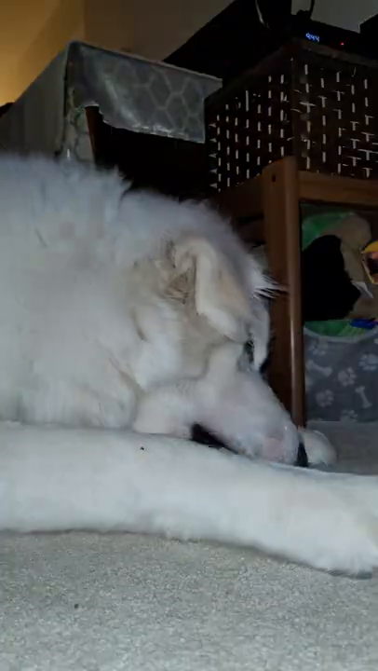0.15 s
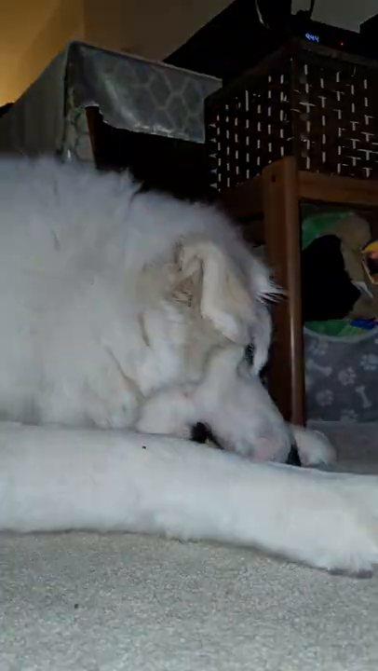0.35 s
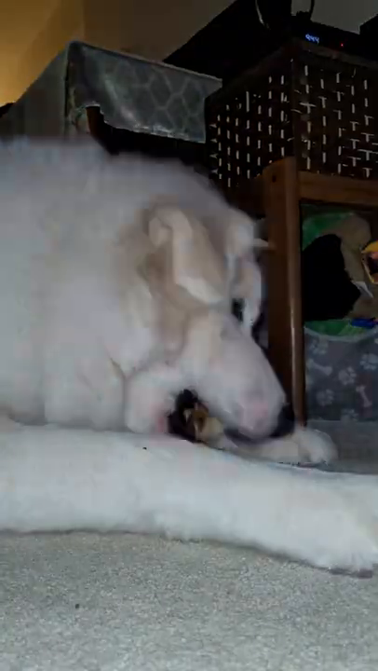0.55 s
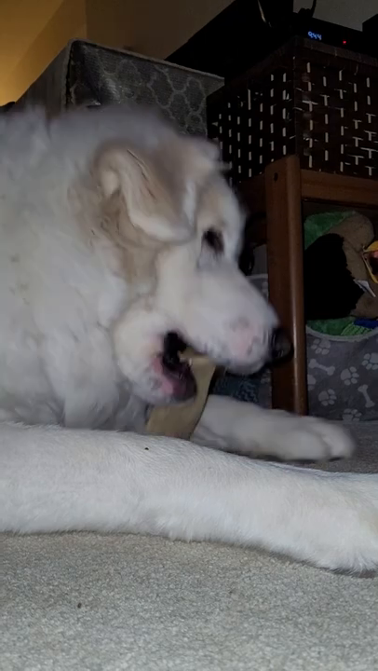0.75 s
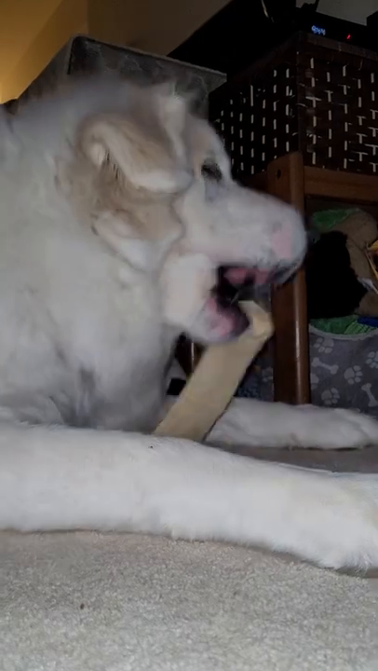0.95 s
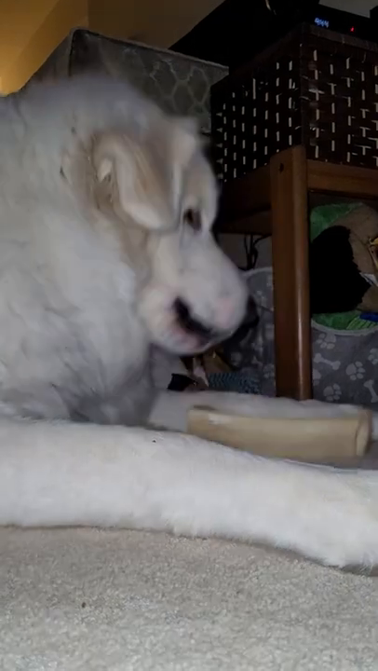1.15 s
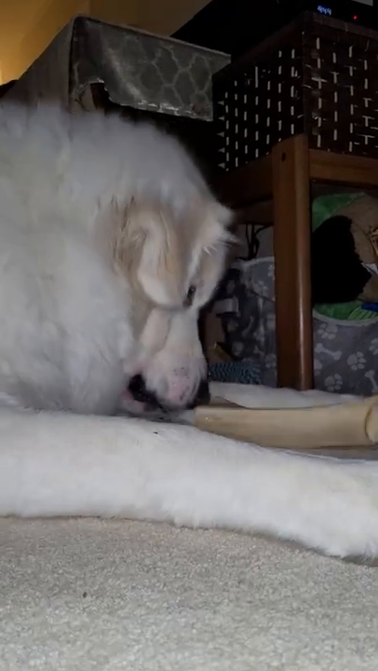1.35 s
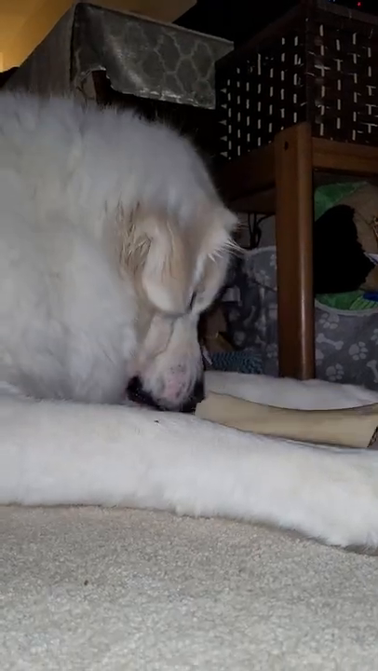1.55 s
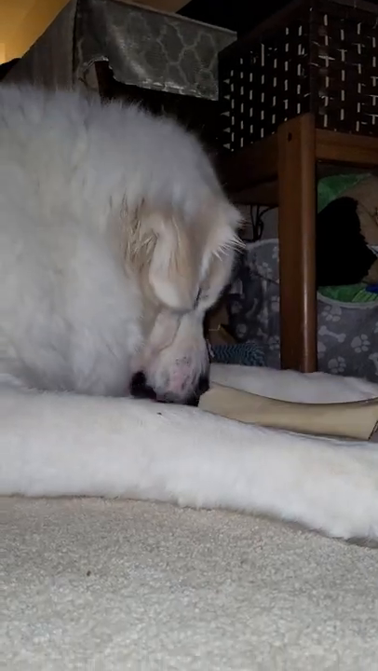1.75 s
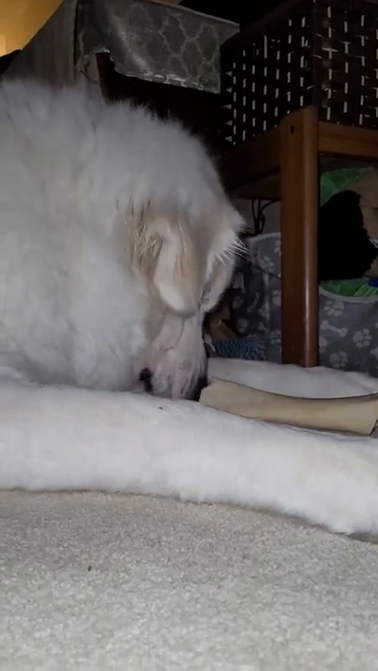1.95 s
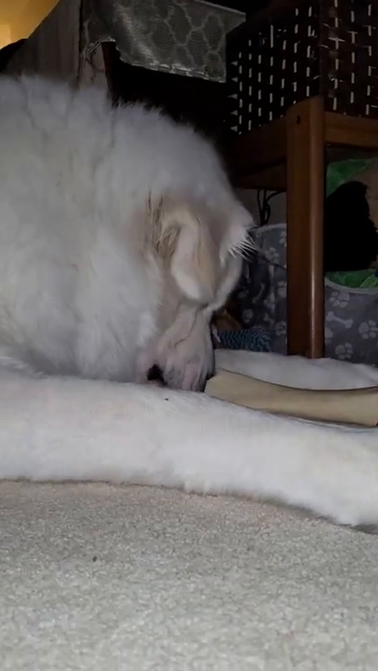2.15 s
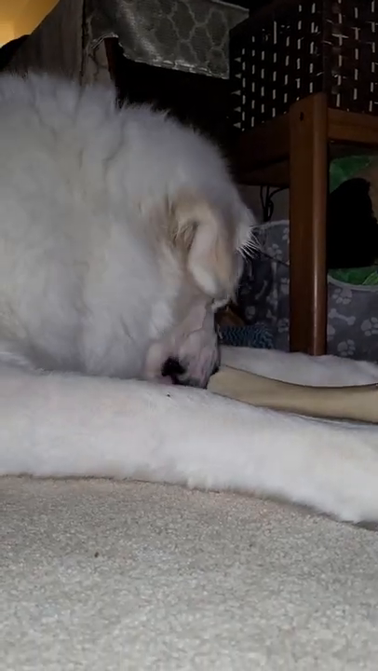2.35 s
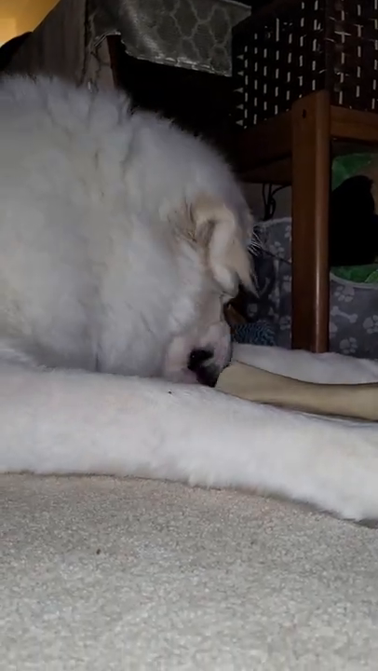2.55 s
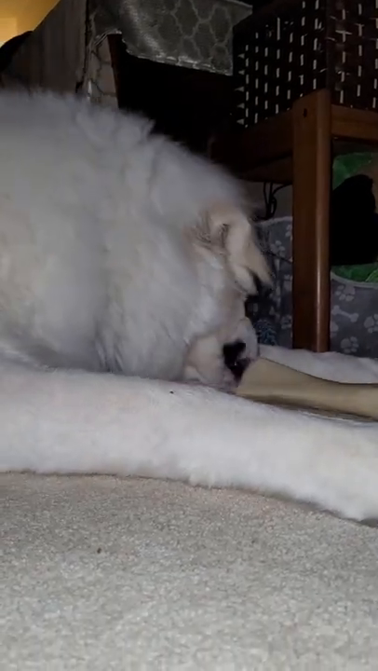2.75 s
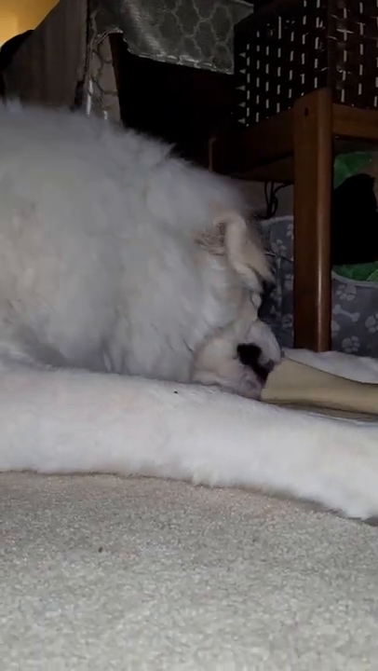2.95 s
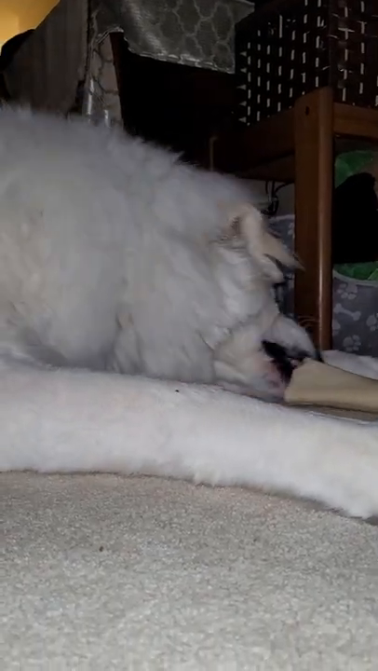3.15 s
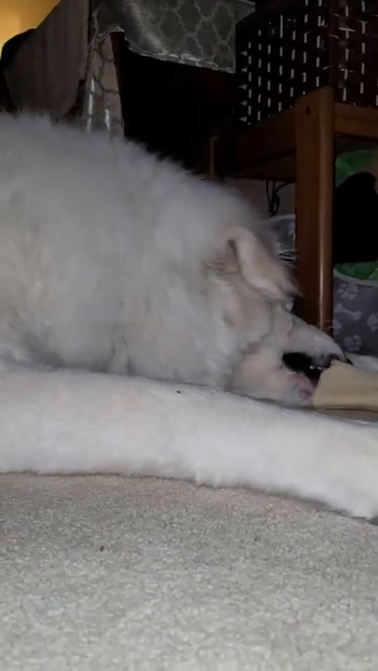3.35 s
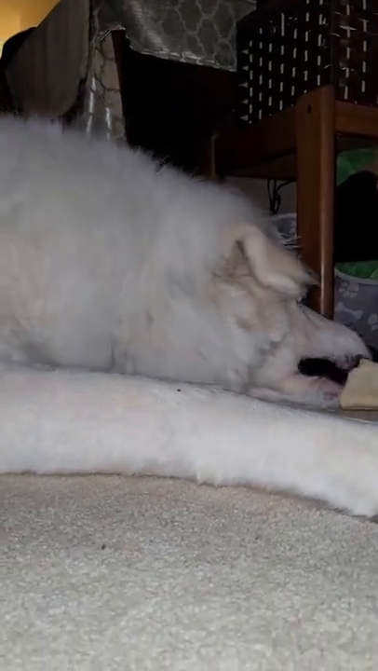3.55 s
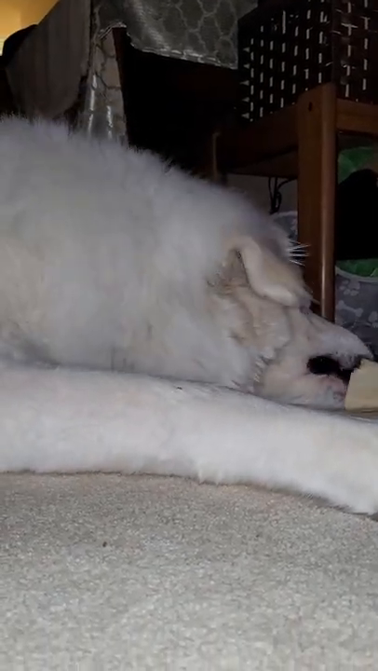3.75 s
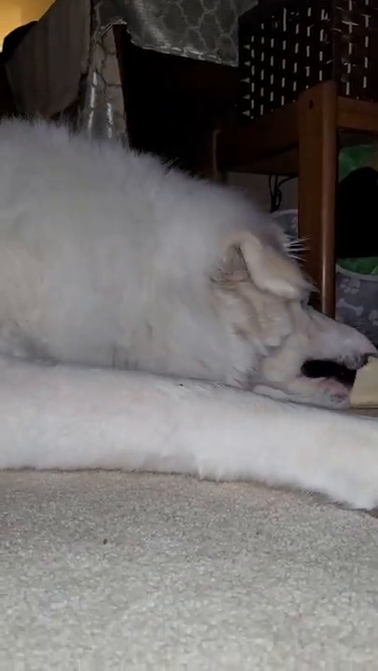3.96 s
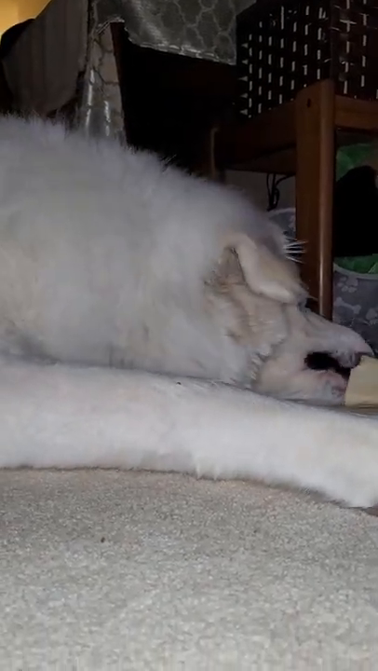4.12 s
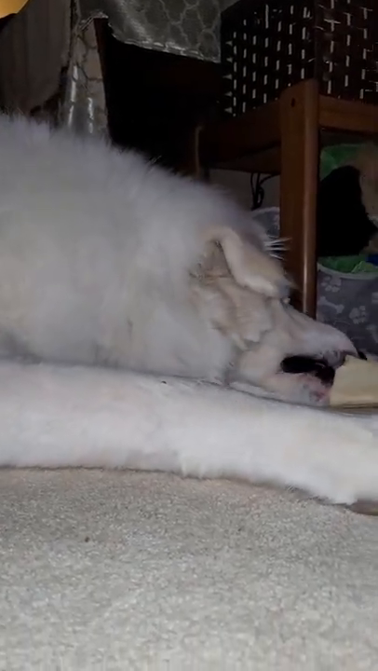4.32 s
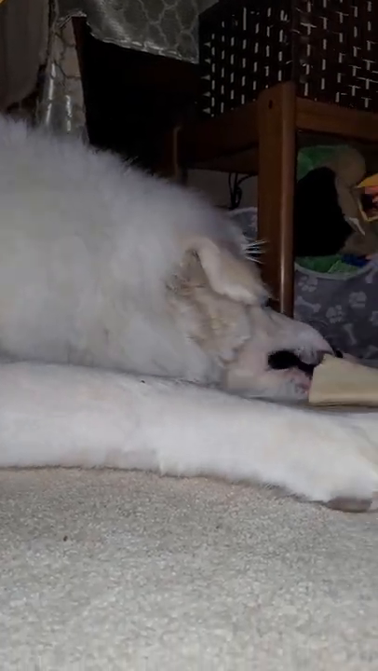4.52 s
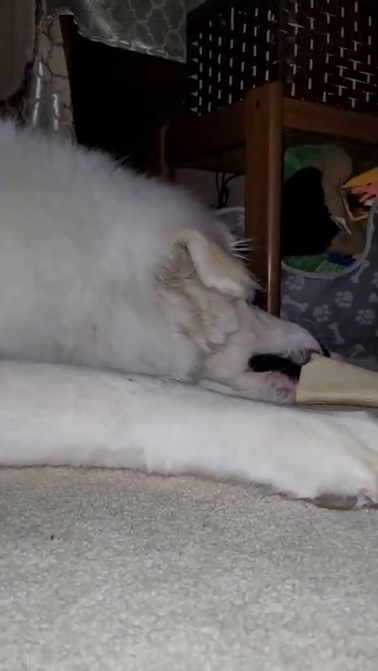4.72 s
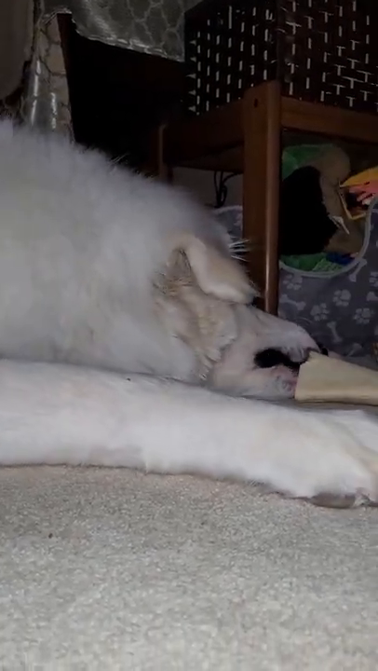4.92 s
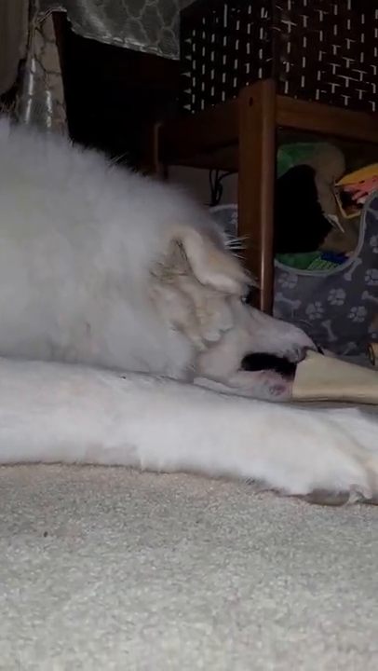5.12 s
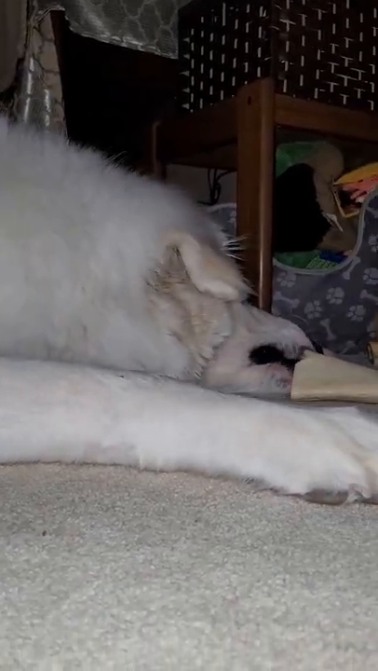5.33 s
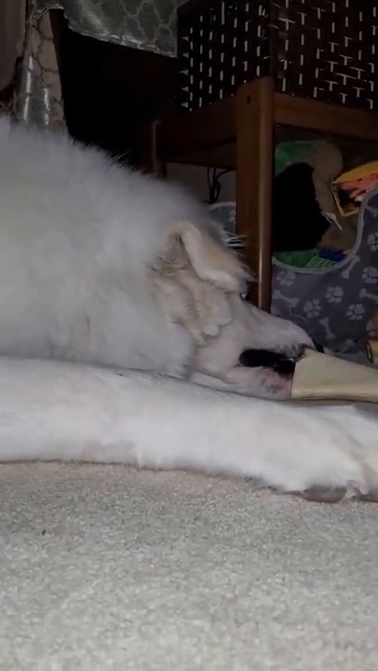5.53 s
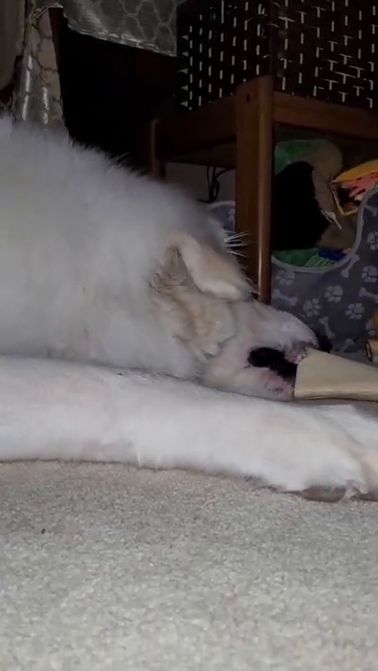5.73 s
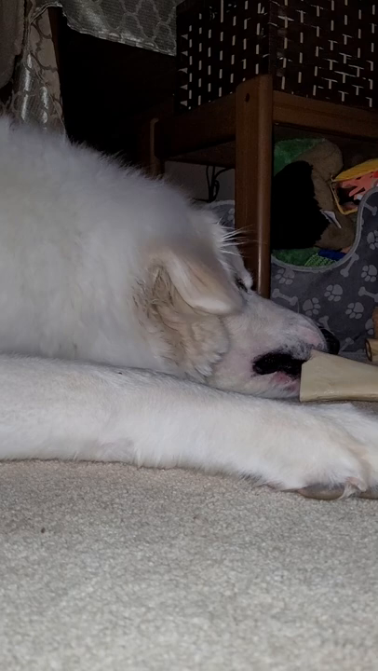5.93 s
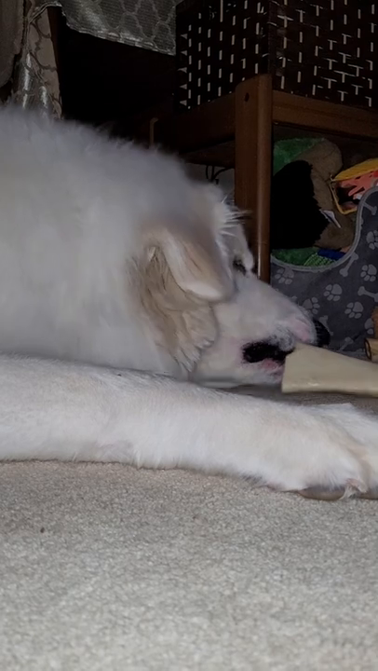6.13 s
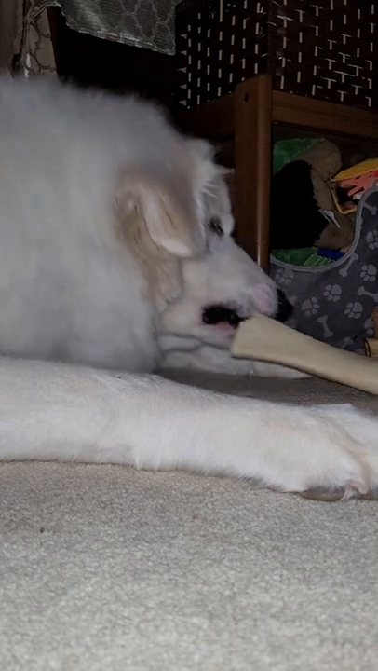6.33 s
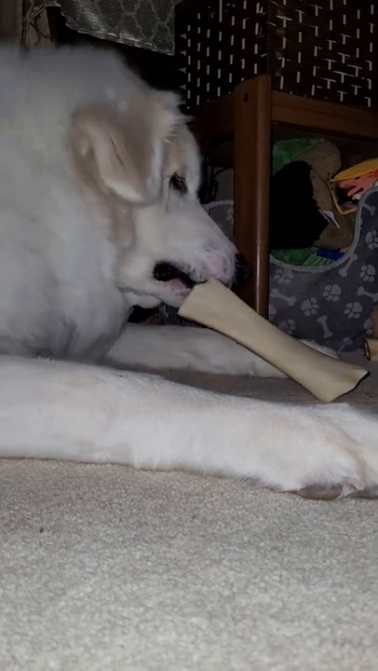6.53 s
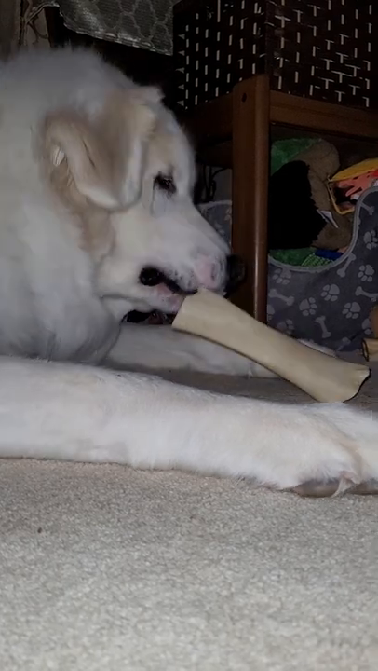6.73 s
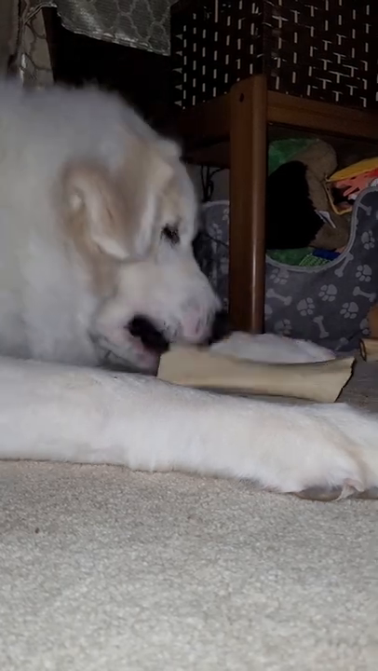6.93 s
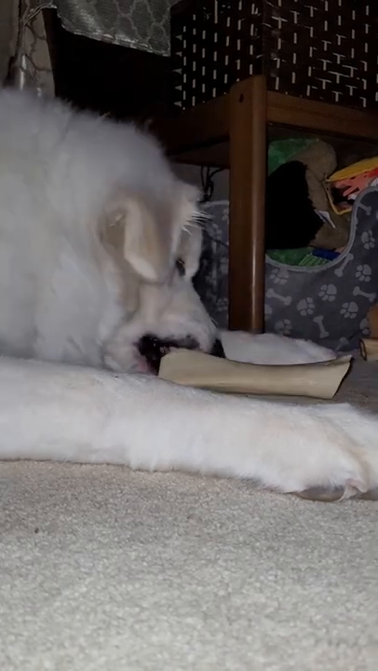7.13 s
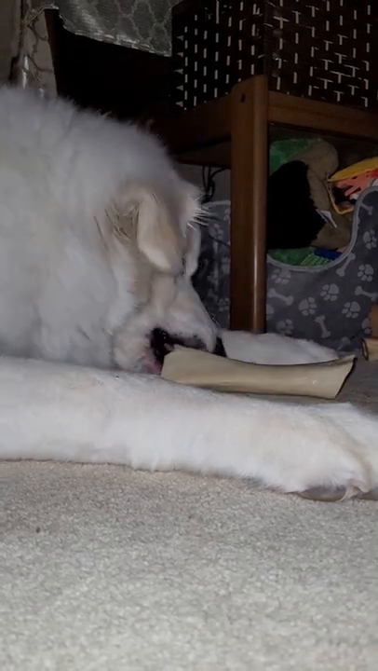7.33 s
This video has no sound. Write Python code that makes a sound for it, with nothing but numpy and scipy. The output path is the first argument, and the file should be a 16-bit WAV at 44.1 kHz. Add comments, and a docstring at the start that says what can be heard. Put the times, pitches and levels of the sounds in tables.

```python
"""A large dog chews a hollow bone on a carpet, heard from a phone on the floor. At first teeth knock and
grind, the bone drops with thuds, and a hand and carpet fibres rustle, tick and pop at the phone's right
microphone. After 2 s come soft grinding and sniffs. From 3 s the dog puffs through its nose and bites
harder, and the rustle builds again. From about 4.7 s the chewing and puffing go on almost alone,
until rustle and a few soft thuds return near 7 s."""
import sys
import numpy as np
from scipy import signal
from scipy.fft import rfft, irfft
from scipy.io import wavfile

SR = 44100
rng = np.random.default_rng(int(sys.argv[2]) if len(sys.argv) > 2 else 0)


def put_to_file(sound):
    """Save the sound as 16-bit audio at rate SR, in the file named by the first command-line argument."""
    columns = np.atleast_2d(sound).T  # one column per channel
    safe = np.clip(columns, -1, 1)
    whole_steps = np.round(safe * 32767)
    wavfile.write(sys.argv[1], SR, whole_steps.astype(np.int16))


N = 329868

# tone of the quiet room: f/Hz, level/dB
ROOM_TONE = [(40, -3.5), (100, -2.5), (180, -7), (350, -14.5), (500, -27.5), (700, -41.5), (1000, -35),
             (2500, -37.5), (7000, -43.5), (13000, -39.5)]
# how alike the room tone is left and right: f/Hz, likeness (0 to 1)
ROOM_LIKENESS = [(60, 1), (400, 0), (1000, 0), (4000, 0)]

# notes the floorboards ring at: f/Hz, width/Hz, level/dB
BOARD_MODES = [(57, 16, 4.5), (79, 21, -6), (107.8, 25, -1), (152.6, 20, -5.5)]
# floor rumble under the dog: t/s, relative level/dB
RUMBLE = [(0, -69), (.2, -61), (.6, -70), (.73, -55.5), (.9, -75), (1.16, -52.5), (1.2, -62),
          (1.242, -31.5), (1.32, -45), (1.39, -46), (1.58, -59), (1.65, -54), (1.92, -54.5), (2.42, -67.5),
          (2.55, -61), (2.94, -62), (3.07, -73.5), (3.73, -66), (3.77, -80), (3.806, -62), (4.26, -64.5),
          (4.59, -54), (4.69, -61.5), (5.06, -69), (5.5, -61), (5.8, -70.5), (5.88, -59.5), (6.5, -67.5),
          (6.87, -56), (6.99, -64.5), (7.06, -55.5), (7.31, -59), (7.478, -65)]
# bone or phone landing: t/s, right peak/dB, base f/Hz, left minus right/dB, ring time/s
THUDS = [(0.1254, -47, 78, -6, 0.11), (0.598, -47, 76, -18.5, 0.051), (0.743, -43, 67, -22, 0.12),
         (0.828, -43, 63.4, -24, 0.068), (1.008, -34.5, 63, -21, 0.12), (1.069, -35, 67, -19, 0.066),
         (1.2514, -16.5, 66.6, -11.5, 0.058), (1.2898, -34, 67.5, 7, 0.08), (1.3327, -37, 60, -5, 0.23),
         (1.382, -26.5, 76, -5.5, 0.12), (1.4607, -36.5, 90, -34, 0.1), (1.928, -25.5, 68.4, -34, 0.03),
         (2.228, -45.5, 66, -24, 0.077), (4.518, -40, 75, -16.0, 0.092), (4.578, -31, 110, -22, 0.044),
         (4.6008, -26.5, 48, -33, 0.073), (4.7322, -49.5, 74.6, -8, 0.29), (7.0626, -38.5, 65.5, -7, 0.19),
         (7.316, -49, 53, -7.9, 0.086), (7.4095, -44.5, 59.7, -10, 0.093)]

# rubbing on the phone, in relative levels: t/s, rustle/dB, scratch over fine rustle/dB, low chafing/dB
RUBBING = [(0, -71.5, -1, -56.5), (.2, -69, 1.5, -52), (.274, -80.5, 1, -63), (.35, -74, -13, -61),
           (.529, -72.5, -14.5, -58.5), (.579, -54, -1, -42.5), (.649, -77.5, 7.5, -50),
           (.833, -62, -2.5, -48), (.913, -67, 6, -52), (.948, -54, 4.5, -42), (1.2, -60, -3, -49),
           (1.232, -56.5, 0.5, -33.5), (1.29, -62, 6, -52), (1.482, -61.5, -2, -58), (1.61, -75.5, -3, -70),
           (1.711, -66.5, -7.5, -53), (1.856, -63, -14, -59), (1.926, -58, 1.5, -44),
           (2.15, -76, -10.5, -77.5), (2.65, -88.5, -12.5, -77.5), (2.95, -94, 3, -68.5),
           (3.113, -74.5, 2.5, -72.5), (3.29, -86.5, 2.5, -69), (3.48, -71.5, -10.5, -70),
           (3.687, -67, -9, -69), (3.771, -74, -15, -74), (3.841, -64.5, -18, -51), (3.926, -59, -3.5, -65),
           (4.076, -63, -3.5, -61), (4.18, -58, 1, -55), (4.235, -51.5, -2.5, -47), (4.41, -53, 1, -51.5),
           (4.57, -52, 3, -39), (4.83, -90, -0.5, -77), (5.3, -83, -0.5, -78), (5.45, -93, -9, -74),
           (5.75, -84, -5, -72.5), (5.9, -90.5, -5, -64.5), (6.2, -93.5, -1, -74.5),
           (6.66, -91.5, -5.5, -69), (6.74, -74.5, -18, -74), (6.84, -84, -15.5, -63),
           (6.91, -71, -11, -68.5), (7.07, -69, -19, -69), (7.149, -65.5, -7, -61),
           (7.288, -59.5, -3.5, -51), (7.478, -63, -2.5, -56.5)]
# tone of the fine rustle: f/Hz, level/dB
RUSTLE_TONE = [(1500, -24), (3500, -9), (5000, -2.5), (7500, 0), (8500, -11.5), (16000, -13.5)]
# tone of the coarse scratch: f/Hz, level/dB
SCRATCH_TONE = [(300, -5.5), (1000, -0.5), (2500, -2.5), (4000, -6.5), (8000, -23.5)]
# tone of the dry crackle: f/Hz, level/dB
CRACKLE_TONE = [(3000, -22.5), (7000, -7.5), (10000, 0), (16000, 8.5)]
# loud snaps of carpet fibres: t/s, right peak/dB, f/Hz, width/octaves
FIBRE_SNAPS = [(.126, -40, 3850, 1.9), (0.1686, -45.5, 7000, 0.79), (0.2052, -21, 6300, 1.46),
               (.5498, -42.5, 1620, 1.3), (0.5943, -11.5, 2690, 1.42), (0.5972, -21.5, 3390, 2.3),
               (.6046, -19, 9000, 6.5), (0.645, -44, 900, 1.3), (.668, -41, 900, 1.3),
               (.694, -35, 1380, 1.94), (.7401, -40, 840, 0.48), (0.783, -38, 5620, 2.5),
               (0.8154, -28, 1390, 2.6), (0.8487, -31, 4460, 2.5), (0.9319, -28.5, 1590, 1.9),
               (0.9526, -22, 1750, 2.6), (0.961, -28, 3070, 1.9), (0.995, -25.5, 2070, 2.3),
               (1.0203, -25, 3900, 1.85), (1.0537, -22, 10100, 1.9), (1.0567, -19.5, 2700, 0.89),
               (1.078, -13, 6940, 10), (1.215, -30.5, 11100, 0.87), (1.226, -29, 2810, 6.7),
               (1.238, -24.5, 2240, 2.7), (1.2453, -23.5, 10700, 1.2), (1.248, -28, 4800, 5.8),
               (1.3417, -36.5, 2370, 0.5), (1.3909, -32, 6960, 1.36), (1.433, -31, 8360, 2.3),
               (1.6037, -43, 5450, 0.8), (1.714, -40, 6800, 1.3), (1.7904, -36.5, 5350, .7),
               (1.8604, -42, 6080, 1), (1.8932, -39, 4580, 1.9), (1.9165, -21, 2080, 0.67),
               (1.955, -36, 5400, 0.67), (2.7059, -55, 5850, 0.85), (3.083, -50.5, 5000, 0.78),
               (3.1171, -46, 2690, 2.4), (3.3215, -49, 2850, 3.3), (3.461, -50, 6000, 1.7),
               (3.5282, -43, 4560, 0.44), (3.564, -46.5, 6200, .82), (3.6208, -45, 4700, 2),
               (3.665, -42.5, 2300, 2.2), (3.814, -37, 9000, 4.1), (3.8372, -27.5, 11300, 0.73),
               (3.8534, -37.5, 7800, 0.39), (3.908, -24, 5430, 1.8), (3.934, -30.5, 4100, 1.5),
               (4.004, -33.5, 4000, 5.2), (4.044, -38, 8070, 1.6), (4.072, -30.5, 9900, 0.56),
               (4.1446, -30, 8090, 1.6), (4.214, -17, 1800, 2.17), (4.2217, -12, 6460, 12),
               (4.235, -29, 7150, 2), (4.2532, -11, 7000, 4.2), (4.2556, -25, 4780, 1.6),
               (4.265, -25, 3380, 3.1), (4.2733, -34, 3370, 2.3), (4.2907, -33, 3570, 2.9),
               (4.308, -15.5, 7400, 7.4), (4.3321, -33, 1700, .59), (4.3372, -27, 3540, 2.5),
               (4.3595, -23.5, 2670, 1.6), (4.3672, -24, 1860, 2.15), (4.3798, -27, 7200, 2),
               (4.442, -18.5, 4420, 2), (4.4461, -15, 4470, 1.73), (4.505, -22, 6510, 3),
               (4.524, -14.5, 3140, 1.26), (4.551, -26, 5620, 1.8), (4.5918, -24, 3580, 4.5),
               (4.6494, -29.5, 6350, 3.6), (4.7052, -39, 2880, 0.9), (5.1307, -47.5, 8430, .74),
               (5.638, -45.5, 10900, 1.3), (6.069, -39, 2900, 2.2), (6.9063, -33.5, 5800, 2.7),
               (6.9225, -35, 9100, 3.8), (7.0204, -40.5, 5590, 3.1), (7.1453, -22.5, 5770, 4.5),
               (7.1783, -29.5, 7300, 1.4), (7.2751, -30.5, 3790, 1.9), (7.2998, -30, 2040, 5.1),
               (7.3506, -19, 4930, 2.1), (7.394, -30, 3520, 4.7), (7.4067, -28.5, 10400, 1.2),
               (7.4479, -27.5, 9690, 2.2)]
# skin slipping on the phone case: t/s, right peak/dB, base f/Hz, left minus right/dB
SKIN_POPS = [(0.2051, -37.5, 615, -13), (0.5616, -45, 234, -21), (0.5943, -32.5, 357, -44),
             (0.6185, -47.5, 700, -19.5), (0.6685, -53, 209, -9), (0.695, -35, 710, -25),
             (.738, -37, 300, -21), (0.74, -35.5, 750, -26), (0.8163, -31.5, 660, -24),
             (0.9583, -28.5, 473, -29), (1.056, -45, 285, -8), (1.0782, -43, 257, -14),
             (1.135, -56, 355, -25.3), (1.2447, -31, 248, -17), (1.351, -43.5, 250, -15),
             (1.4116, -38, 221, -26), (1.4555, -35, 224, -17), (1.488, -42.5, 313, -33.6),
             (1.6411, -37.5, 210, -17), (1.7012, -40.5, 224, -16), (1.7328, -39.5, 223, -19.7),
             (1.7741, -39.5, 236, -21.4), (1.8163, -41, 280, -17.5), (1.8868, -43, 250, -22),
             (1.9214, -31, 248, -10.5), (1.9338, -40.5, 453, -27), (1.9881, -45, 253, -19.6),
             (2.0127, -39.5, 226, -18), (2.2003, -40, 223, -23), (4.2159, -31, 1113, -49),
             (4.2529, -40, 760, -32), (4.3608, -41, 317, -31), (4.4439, -38, 610, -34),
             (4.5244, -38, 393, -33.0), (4.717, -51, 233, -23), (7.1464, -49.5, 269, -13),
             (7.276, -42.5, 330, -26), (7.299, -43, 340, -25), (7.306, -42.5, 780, -29),
             (7.353, -49, 393, -23), (7.396, -46.5, 554, -19)]

# puffs through nose and lips: t/s, hold/s, left level/dB, high hiss over nose sound/dB
PUFFS = [(0.066, 0.073, -73.5, -10), (.654, 0.064, -84, -2), (.82, 0.19, -74, -7), (1.156, .04, -79, -6),
         (1.252, .03, -75, -14), (1.94, .01, -72, -3), (3.113, 0.17, -78, -5), (3.301, 0.016, -67, 5),
         (3.448, 0.12, -76.5, -2), (3.647, .03, -75, -6), (3.696, .04, -69, 5), (3.786, .002, -67, 4),
         (3.947, .03, -79, -4), (4.05, 0.11, -69.5, 3), (4.347, .02, -67, 4), (4.463, 0.07, -64, 4),
         (4.762, .01, -73, 5.5), (4.867, 0.072, -70, 1), (5.165, 0.021, -73.5, 4), (5.277, 0.083, -68, 1.5),
         (5.54, 0.077, -75.5, 2.5), (5.696, 0.097, -67, 4), (6.879, 0.092, -83, -1), (7.29, .02, -76, 8)]
# bands the nose rings in: f/Hz, width/Hz, level/dB
NOSE_MODES = [(5770, 2700, -9.5), (7400, 550, -0.5), (2150, 1500, -15.5)]
# nostril whistle that grows as the air speeds up: f/Hz, width/Hz, level/dB
NOSTRIL_MODE = [(4580, 790, 0)]
# tone of the high hiss in a puff: f/Hz, level/dB
HISS_TONE = [(6000, -31), (8500, -3.5), (12000, 1.5), (16000, -2.5)]
# sniffs, squeaks and wheezes: t/s, length/s, left level/dB, f/Hz, width/Hz
SNIFFS = [(0.842, 0.033, -54, 635, 60), (0.886, 0.023, -57, 2530, 300), (.89, .02, -40.5, 593, 121),
          (0.931, 0.04, -59, 2630, 600), (1.796, 0.045, -75, 955, 700), (2.16, 0.059, -77.5, 850, 600),
          (2.339, .05, -84.5, 800, 703), (2.517, 0.043, -81, 746, 692), (2.717, 0.052, -81.5, 753, 500),
          (2.912, 0.073, -66.5, 770, 253), (3.612, 0.094, -73, 920, 350), (3.68, 0.059, -78, 2620, 1200),
          (3.96, .05, -77, 1600, 300), (4.018, 0.069, -74, 984, 200), (4.374, 0.065, -68.5, 1700, 500),
          (4.442, .1, -76, 810, 300), (4.445, .1, -76.5, 1500, 500), (5.154, 0.068, -78.5, 782, 398),
          (5.564, 0.092, -78, 716, 397), (5.71, 0.065, -85.5, 1740, 502), (6.857, 0.051, -68.5, 4500, 300),
          (7.14, 0.036, -80, 1600, 120), (7.273, 0.059, -68, 780, 250)]

# notes the hollow bone rings at: f/Hz, width/Hz, level/dB
BONE_MODES = [(240, 110, 3.5), (396.7, 110, 2), (487.5, 71, 0), (573, 130, -2), (750, 110, -5),
              (827, 270, -11), (2370, 170, -25)]
# teeth grinding along the bone: t/s, hold/s, relative level/dB
GRINDS = [(.06, .08, -56.5), (.2, 0.18, -65.5), (.5, 0.043, -82), (.72, 0.035, -75), (.89, 0.078, -57),
          (1.217, 0.025, -65.5), (1.39, .02, -78), (1.916, .01, -71.5), (2.35, 0.025, -80.5),
          (2.544, 0.019, -77.5), (2.739, 0.0092, -71.5), (2.93, 0.021, -68.5), (3.02, 0.04, -72.5),
          (3.11, 0.068, -62.5), (3.2, 0.044, -57.5), (3.6, 0.016, -71.5), (3.8, 0.06, -62),
          (3.93, 0.057, -70), (4.14, 0.033, -69.5), (4.4, 0.09, -70), (4.57, 0.036, -76),
          (4.74, 0.042, -72), (4.9, 0.068, -73), (5.18, 0.057, -73), (5.34, 0.026, -71), (5.58, 0.029, -75),
          (5.73, 0.05, -83.5), (5.88, 0.032, -73), (6.2, .04, -80), (6.37, 0.046, -70), (6.57, .06, -82),
          (6.79, .03, -73.5), (6.86, 0.024, -72.5), (7.12, 0.087, -81), (7.3, .05, -73), (7.45, .03, -67)]
# teeth striking the bone: t/s, right peak/dB, f/Hz, left minus right/dB, ring time/s
KNOCKS = [(0.0535, -46.5, 443, -3, 0.092), (.093, -40.5, 730, -17, 0.07), (.143, -38, 750, -14, .08),
          (0.1833, -34.2, 381, -1, 0.23), (0.3352, -53, 320, -5, 0.091), (0.899, -30, 550, -7, 0.06),
          (0.9306, -47, 283, -18, 0.1), (0.995, -53, 349.0, -6.2, 0.12), (1.2295, -32.5, 324, -3.5, 0.096),
          (1.3699, -39, 276, 0, 0.12), (2.7359, -58, 326, -0.5, 0.087), (2.8996, -55.5, 268, 2, 0.11),
          (3.1218, -47.5, 720, -8, 0.12), (3.2783, -57, 376, 10, 0.15), (3.617, -54.5, 940, -2, 0.095),
          (3.79, -22, 490, -1, 0.13), (3.8056, -30, 535, -22, 0.047), (4.121, -33.5, 401, -5.5, 0.12),
          (4.3914, -44, 760, -6, 0.12), (4.5714, -30, 454, -7.5, 0.12), (4.9108, -55, 315, -4, 0.086),
          (5.1706, -55.5, 546, -10, 0.11), (5.3286, -49, 353, -4, 0.12), (5.5712, -52, 550, -6, 0.11),
          (5.8646, -38, 410, -2, 0.1), (5.8741, -45.5, 387, -2, 0.092), (5.9265, -46.5, 438.0, -6, 0.2),
          (6.368, -56, 260, -6.5, 0.13), (6.8703, -41, 382, -2, 0.12), (7.0429, -48.5, 248, 0, 0.1)]
# wet clicks of teeth and tongue: t/s, relative peak/dB, f/Hz, width/octaves
WET_CLICKS = [(0.6943, -64, 2030, 1.5), (0.8184, -43, 2800, 2.6), (0.9315, -63, 1750, 1.6),
              (0.9504, -46, 1970, 1.7), (0.9942, -38, 1530, 1.9), (1.0537, -43, 2320, 2.3),
              (1.238, -44, 1590, 2.1), (1.92, -32, 1740, 4.9), (3.294, -49, 5390, 2.7),
              (3.4288, -59, 7300, 0.45), (3.464, -53, 7540, 0.24), (3.542, -50, 6650, 0.75),
              (3.684, -54, 3950, 0.97), (4.0357, -57, 2010, 3.1), (4.1471, -44, 5760, 2.4),
              (4.3402, -54, 7980, 1), (6.8673, -58.5, 3970, 0.56), (7.248, -50, 9200, 2.6)]


def amp(db):
    """Turns decibels into a gain to multiply by."""
    return 10 ** (np.asarray(db) / 20)


def unit_power(x):
    """Scales a signal to an average power of 1."""
    return x / np.sqrt(np.mean(x ** 2) + 1e-20)


def curve_at(points, hz):
    """Looks up a table of (frequency, value) at any frequency."""
    f, value = np.transpose(points)
    return np.interp(np.log(hz + 1), np.log(f + 1), value)


def level(table, column):
    """Gain over time from one dB column."""
    rows = np.array(table)
    return amp(np.interp(np.arange(N) / SR, rows[:, 0], rows[:, column]))


def coloured(x, tone):
    """Turns low and high frequencies up or down to follow a tone table."""
    return irfft(rfft(x) * amp(curve_at(tone, np.fft.rfftfreq(N, 1 / SR))), N)


def ring(x, modes):
    """Makes x ring at each (f/Hz, width/Hz, level/dB), filtering twice for a cleaner band."""
    out = 0
    for k, (hz, width, db) in enumerate(modes):
        pole = np.exp((2j * np.pi * hz - np.pi * width) / SR)
        once = signal.lfilter([1 - abs(pole)], [1, -pole], x)
        twice = signal.lfilter([1 - abs(pole)], [1, -pole], once)
        out = out + (-1) ** k * amp(db) * twice.real
    return out


def grit(per_s, spread_db, smooth):
    """Scattered clicks of uneven size, plus a share of smooth noise."""
    noise, draw, size = rng.standard_normal(N), rng.random(N), rng.exponential(1, N)
    clicks = noise * (draw < per_s / SR) * amp(spread_db * np.minimum(size, 4))
    return unit_power(unit_power(clicks) + smooth * rng.standard_normal(N))


def flecks(per_s, spread_db, smooth, fade_samples):
    """Tiny fading noise bursts of uneven size, plus a share of smooth noise."""
    draw, size = rng.random(N), rng.exponential(1, N)
    starts = (draw < per_s / SR) * amp(spread_db * np.minimum(size, 4))
    bursts = signal.lfilter([1], [1, -np.exp(-1 / fade_samples)], starts)
    return unit_power((unit_power(bursts) + smooth) * rng.standard_normal(N))


def snap(hz, octaves, noise):
    """A sudden click, strongest around hz, with a brief rattle after it."""
    f = np.fft.rfftfreq(512, 1 / SR) + 1
    away = np.log2(f / hz) / octaves * np.where(f < hz, .7, 1)  # falls more slowly toward the bass
    log_gain = np.log(amp(np.maximum(-12 * away ** 2, -24)))
    fold = np.r_[1, np.full(255, 2), 1, np.zeros(255)]  # allows no sound before the start
    click = irfft(np.exp(rfft(irfft(log_gain) * fold)))[:256]
    rattle = amp(-20.5) * noise * np.exp(-np.arange(128) / 28)
    rattle[0] = 1
    return np.convolve(click, rattle)


def strokes(rows, rise_db_per_s, fall_db_per_s):
    """One gain curve a row, in steps of 64 samples: it climbs, holds and sinks."""
    t = np.arange(0, N + 64, 64) / SR
    s, hold, db = np.array(rows).T[:3, :, None]
    return amp(db - rise_db_per_s * np.maximum(s - t, 0) - fall_db_per_s * np.maximum(t - s - hold, 0))


def summed(gains, rest_db):
    """Joins strokes and a resting level into one gain a sample by adding their powers."""
    total = np.sqrt((gains ** 2).sum(0) + amp(rest_db) ** 2)
    return np.interp(np.arange(N), np.arange(len(total)) * 64, total)


def add(mix, s, sound, db, pan_db):
    """Places a sound with its peak at time s: db on the right, db + pan_db on the left."""
    top = abs(sound).argmax()
    part = mix[:, round(s * SR) - top:][:, :len(sound)]
    part += np.outer(amp([db + pan_db, db]) / abs(sound[top]), sound[:part.shape[1]])


def room_tone(level_db=-68):
    """Distant house hum and microphone hiss."""
    hz = np.fft.rfftfreq(N, 1 / SR)
    left, other = rfft(rng.standard_normal((2, N)))
    alike = np.clip(curve_at(ROOM_LIKENESS, hz), 0, 1)
    right = alike * left + np.sqrt(1 - alike ** 2) * other
    spectrum = np.array([left, right]) * amp(curve_at(ROOM_TONE, hz))
    return amp(level_db) * unit_power(irfft(spectrum, N))


def room_echo(x, ring_s=0.21):
    """The short, dull echo of a furnished room."""
    t = np.arange(9000) / SR
    tail = rng.standard_normal((2, 9000)) * amp(-60 * t / ring_s) * (t > .006)
    tail = signal.lfilter([.15], [1, -.85], tail)  # softens the treble
    return signal.fftconvolve(x.mean(0)[None], tail / np.linalg.norm(tail[0]), axes=1)[:, :N]


def floor():
    """Boards rumble as the dog shifts its weight, and swing with falling pitch at each landing."""
    shake = unit_power(ring(grit(per_s=60, spread_db=1.3, smooth=1.5), BOARD_MODES))
    out = level(RUMBLE, column=1) * shake * amp([[-1], [1.5]])  # left, right
    t = np.arange(-3000, 9000) / SR
    for s, db, hz, pan_db, ring_s in THUDS:
        swell = np.where(t < 0, np.exp(-(t * hz / 0.72) ** 2), amp(-60 * t / ring_s))
        cycles = hz * (0.69 * t - 0.0055 * np.expm1(-np.maximum(t, -.03) / 0.022))
        add(out, s, -np.cos(2 * np.pi * cycles) * swell, db, pan_db)
    return out


def pressure(per_s, depth_db):
    """Uneven pressing: a random gain that wanders about per_s times a second."""
    band = signal.butter(1, [per_s / 2, per_s * 2], "band", fs=SR, output="sos")
    wander = signal.sosfilt(band, rng.standard_normal(N))
    return unit_power(amp(depth_db * unit_power(wander)))


def small_snaps(per_s=45, above_rubbing_db=14):
    """Lesser fibre snaps at random times and pitches, louder when the rubbing is stronger."""
    kinds = rng.random((16, 2))
    which = rng.integers(0, len(kinds), N)
    hit = rng.random(N) < per_s / SR
    size = hit * amp(above_rubbing_db + 3.45 * rng.standard_normal(N)) * level(RUBBING, column=1)
    out = 0
    for k, (pitch, width) in enumerate(kinds):
        click = snap(2700 * 2 ** (2.1 * pitch), 0.779 + 4.8 * width, rng.standard_normal(128))
        out = out + signal.oaconvolve(size * (which == k), click / abs(click).max())[:N]
    return out


def rubbing():
    """Many small fibres brush the phone: rustle, scratch and crackle over a low chafing."""
    fine = unit_power(coloured(flecks(620, 7.5, 0.46, fade_samples=33), RUSTLE_TONE))
    scratch = unit_power(coloured(flecks(300, 2.1, 0.94, fade_samples=25), SCRATCH_TONE))
    crackle = unit_power(coloured(flecks(230, 1.6, 0.46, fade_samples=21), CRACKLE_TONE))
    chafe = ring(grit(150, 2.4, .6), modes=[(84, 150, 0.5), (240, 260, -2), (600, 500, -13.5)])
    rustle = fine + level(RUBBING, column=2) * scratch + amp(-4.5) * crackle
    rustle *= level(RUBBING, column=1) * pressure(per_s=8.8, depth_db=2.5)
    return amp(-2) * rustle + amp(-3) * level(RUBBING, column=3) * unit_power(chafe)


def handling():
    """At the right microphone, fibres rub and snap, and slipping skin pops with falling pitch."""
    out = (rubbing() + small_snaps()) * amp([[-30], [0]])
    for s, db, hz, octaves in FIBRE_SNAPS:
        add(out, s, snap(hz, octaves, rng.standard_normal(128)), db, pan_db=-48)
    for s, db, hz, pan_db in SKIN_POPS:
        cycles = np.arange(round(4 * SR / hz)) * hz / SR
        pop = np.sin(2 * np.pi * 1.3 * cycles ** .8) * cycles ** 2 * np.exp(-2.8 * cycles)
        add(out, s, -pop, db, pan_db)
    return out


def breath(calm_db=-96):
    """Air swirls through the narrow nose and lips: puffs, mostly on the left, and short sniffs."""
    puffs = strokes(PUFFS, rise_db_per_s=900, fall_db_per_s=260)
    flow = summed(puffs, calm_db)
    hiss_share = summed(puffs * amp(np.array(PUFFS)[:, 3:]), calm_db) / flow
    air = np.array([grit(per_s=3600, spread_db=1.4, smooth=3) for side in range(2)])
    whistle = amp(-6) * (flow / flow.max()) ** 0.453 * unit_power(ring(air, NOSTRIL_MODE))
    nose = unit_power(ring(air, NOSE_MODES)) + whistle
    hiss = hiss_share * unit_power(coloured(air, HISS_TONE))
    out = flow * (nose + hiss) / np.sqrt(1 + hiss_share ** 2) * amp([[0], [-12]])
    for s, length, db, hz, width in SNIFFS:
        progress = np.arange(round(length * SR)) / (length * SR)
        wheeze = ring(rng.standard_normal(6000), [(hz, width, 0)])[-len(progress):]
        sniff = unit_power(wheeze) * np.sin(np.pi * progress)
        side_db = -8 * np.log10(hz / 700)  # the right microphone is shaded from the treble
        out[:, round(s * SR):][:, :len(sniff)] += amp([[db], [db + side_db]]) * sniff
    return out


def chewing():
    """Teeth slip, catch and strike, making the bone ring; teeth and tongue click wetly on the left."""
    effort = summed(strokes(GRINDS, rise_db_per_s=340, fall_db_per_s=130), rest_db=-88.5)
    scrape = unit_power(ring(grit(per_s=400, spread_db=2.1, smooth=0.41), BONE_MODES))
    out = effort * scrape * amp([[-2], [1]])
    t = np.arange(8000) / SR
    for s, db, hz, pan_db, ring_s in KNOCKS:
        cycles = t * hz - 2  # zero at the peak of the blow
        blow = np.cos(2 * np.pi * cycles) * np.exp(-(cycles / .75) ** 2)
        bone = unit_power(ring(rng.standard_normal(len(t)), BONE_MODES))
        fade = amp(-60 * t / ring_s) * np.clip(cycles, 0, 1)
        add(out, s, blow + amp(-19) * bone * fade, db, pan_db)
    for s, db, hz, octaves in WET_CLICKS:
        add(out, s, snap(hz, octaves, rng.standard_normal(128)), db - 6, pan_db=8)
    return out


def scene():
    """Mixes the dog and its echo with the floor, the touches on the phone and the quiet room."""
    dog = chewing() + breath()
    dog[0] = np.roll(dog[0], 6)  # left is 6 samples late: the dog is nearer the right microphone
    return dog + amp(-15) * room_echo(dog) + floor() + handling() + room_tone()


def record(dry, low_hz=38, high_hz=15900):
    """The small microphones lose the deepest bass, and the phone cuts the highest treble."""
    thin = signal.sosfilt(signal.butter(2, low_hz, "high", fs=SR, output="sos"), dry)
    treble_cut = signal.firwin(511, high_hz, window=("kaiser", 9), fs=SR)
    return signal.oaconvolve(thin, treble_cut[None], "same")


dry = scene()
out = record(dry)
put_to_file(out)
```